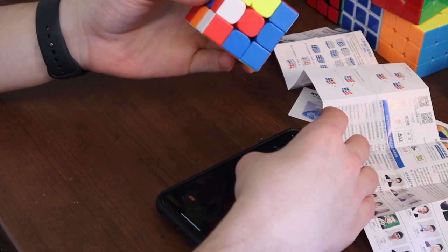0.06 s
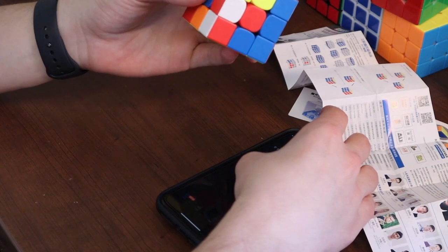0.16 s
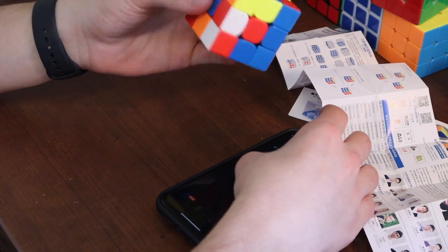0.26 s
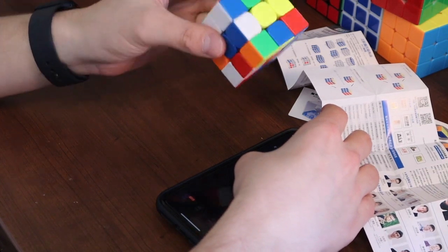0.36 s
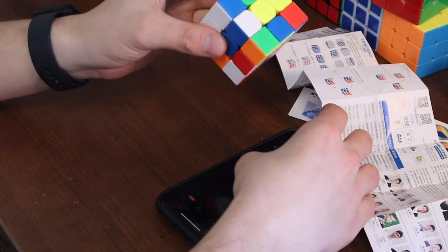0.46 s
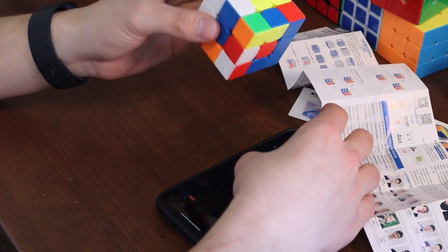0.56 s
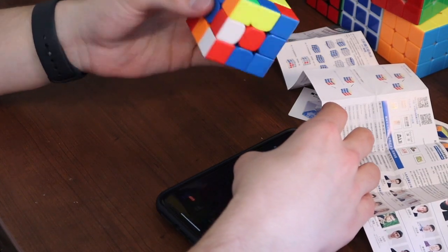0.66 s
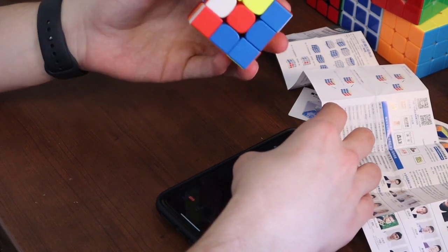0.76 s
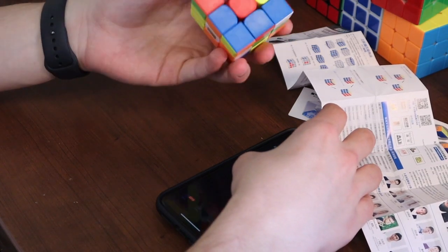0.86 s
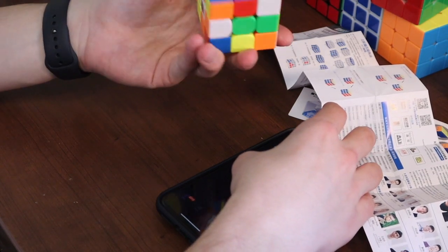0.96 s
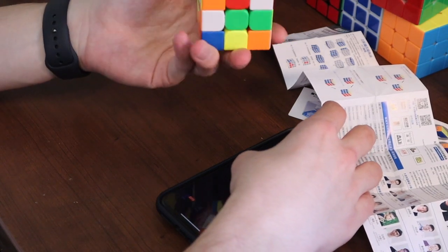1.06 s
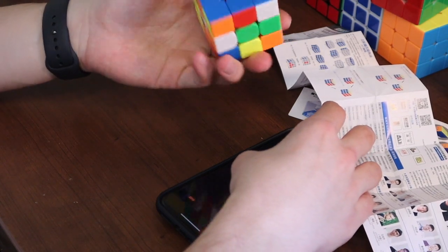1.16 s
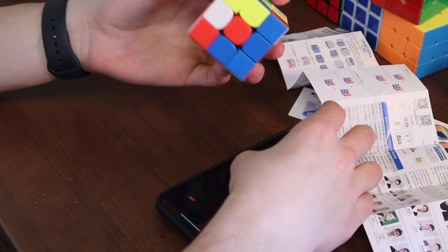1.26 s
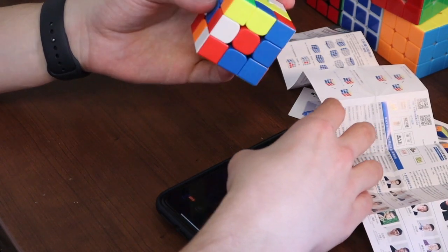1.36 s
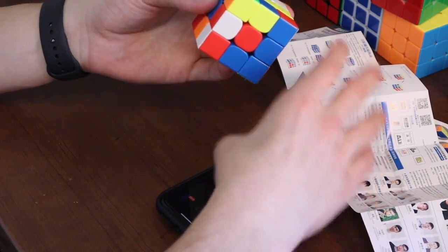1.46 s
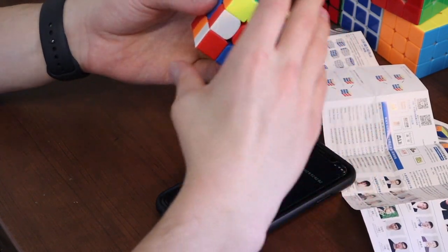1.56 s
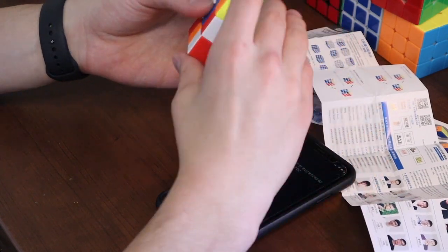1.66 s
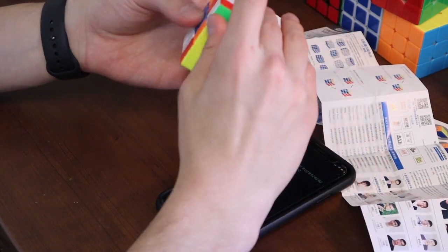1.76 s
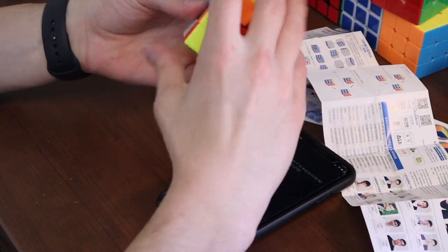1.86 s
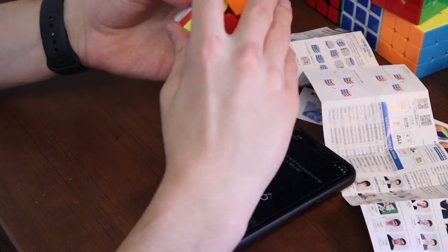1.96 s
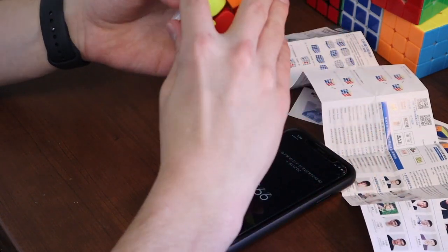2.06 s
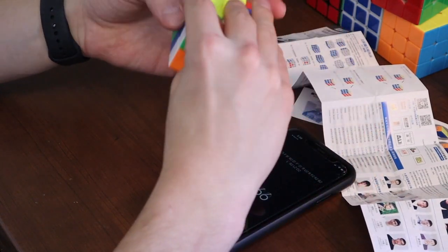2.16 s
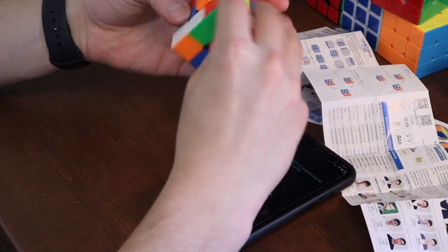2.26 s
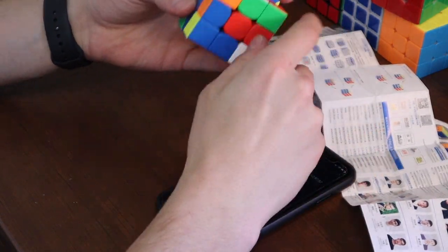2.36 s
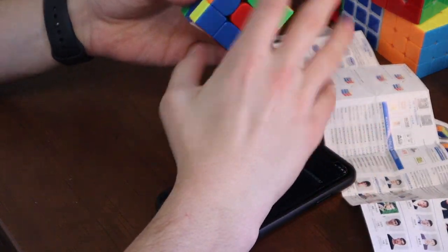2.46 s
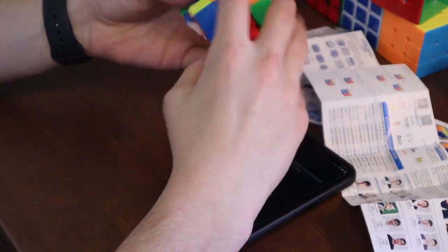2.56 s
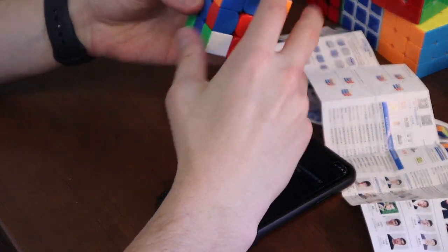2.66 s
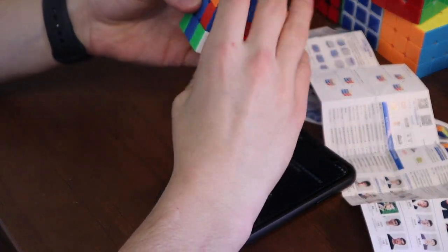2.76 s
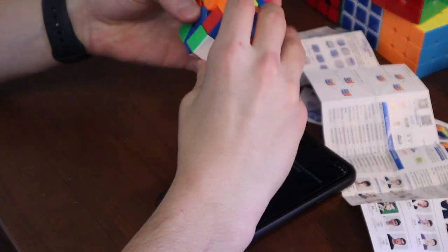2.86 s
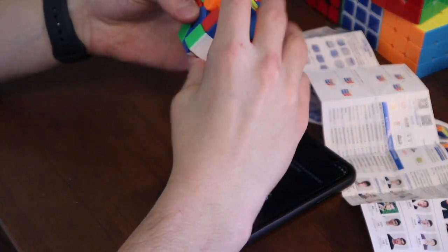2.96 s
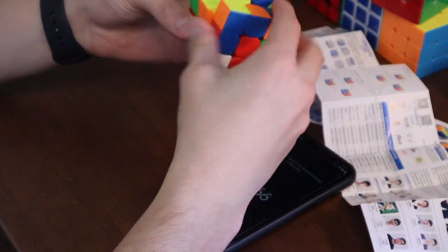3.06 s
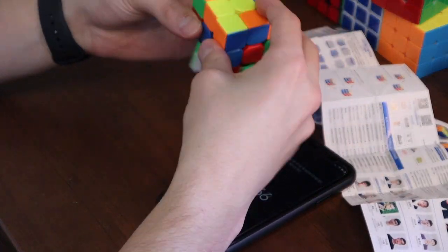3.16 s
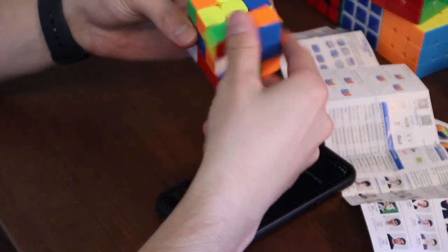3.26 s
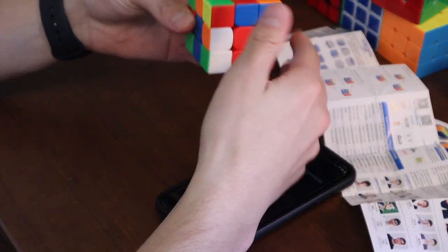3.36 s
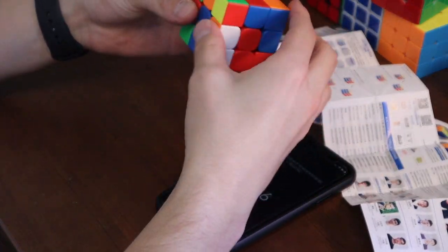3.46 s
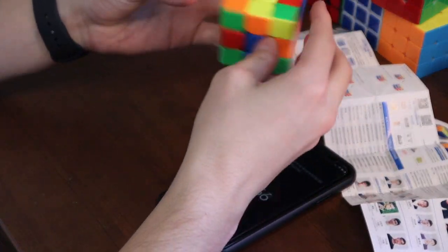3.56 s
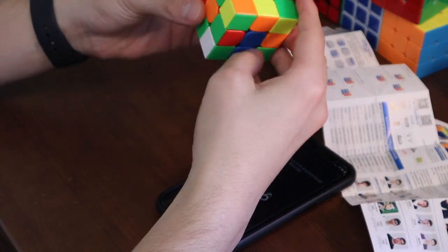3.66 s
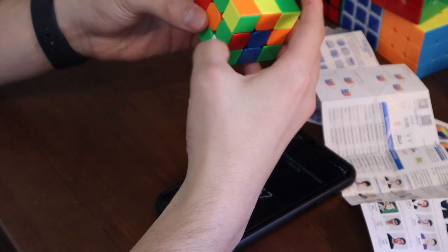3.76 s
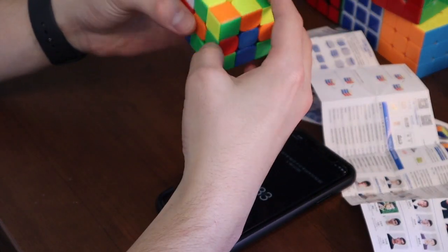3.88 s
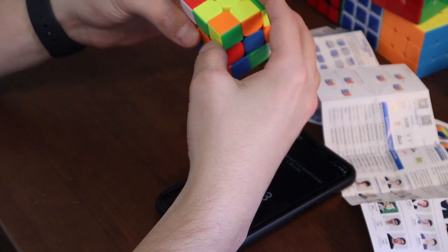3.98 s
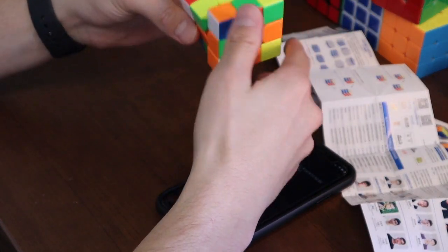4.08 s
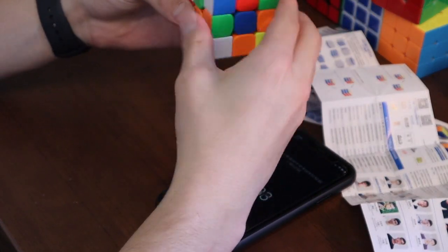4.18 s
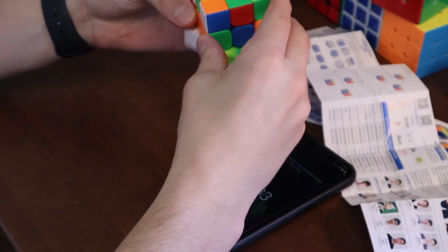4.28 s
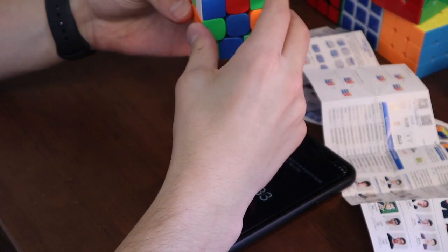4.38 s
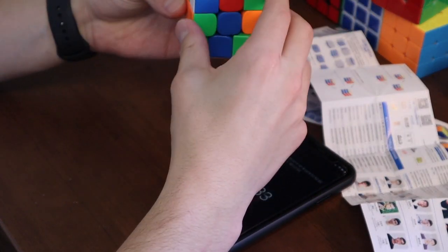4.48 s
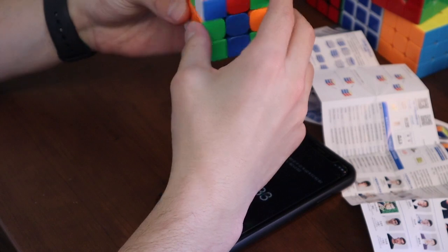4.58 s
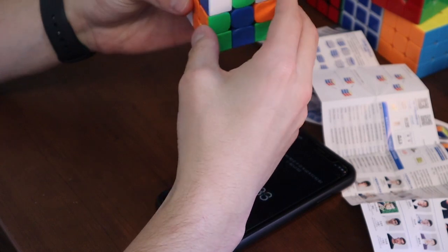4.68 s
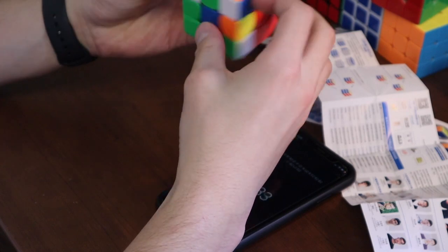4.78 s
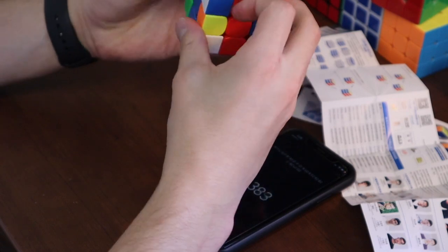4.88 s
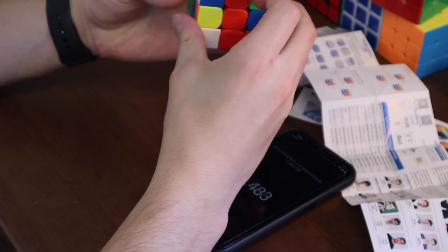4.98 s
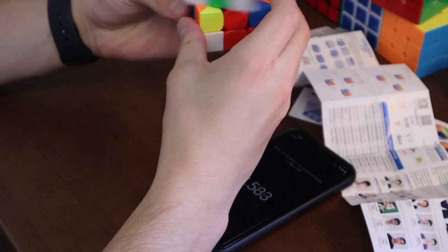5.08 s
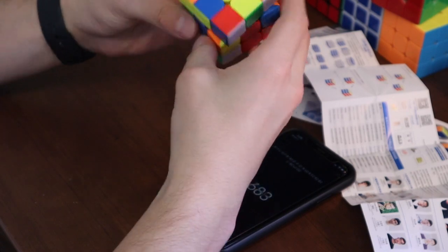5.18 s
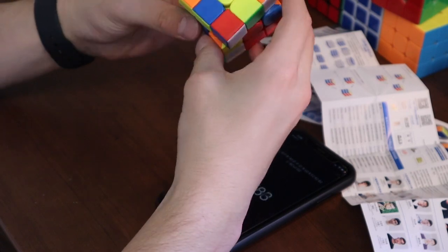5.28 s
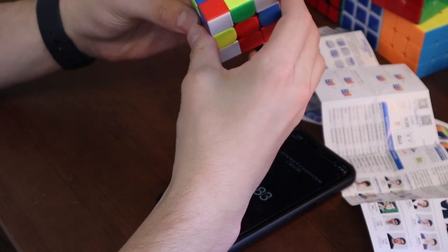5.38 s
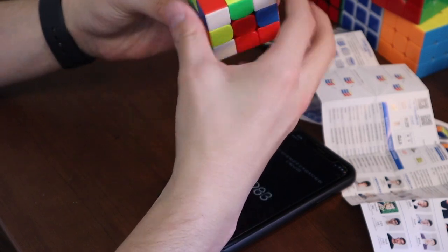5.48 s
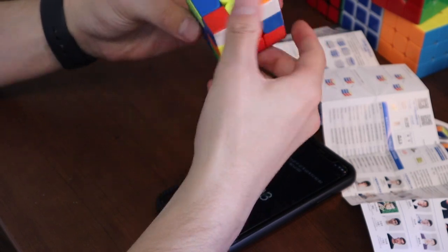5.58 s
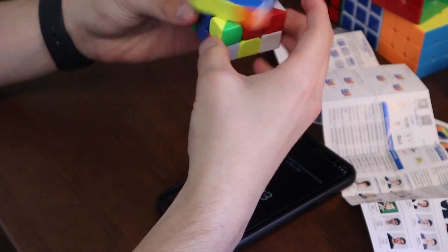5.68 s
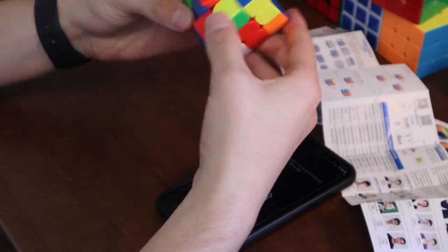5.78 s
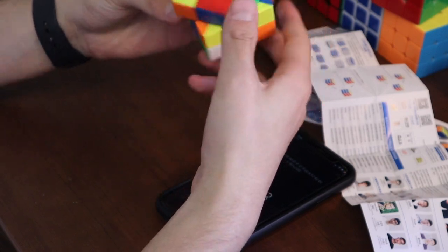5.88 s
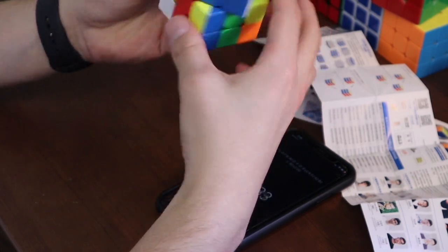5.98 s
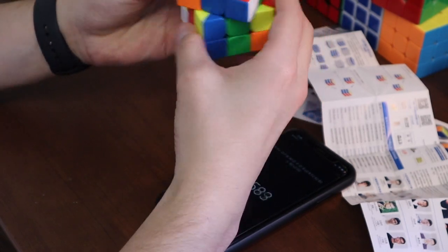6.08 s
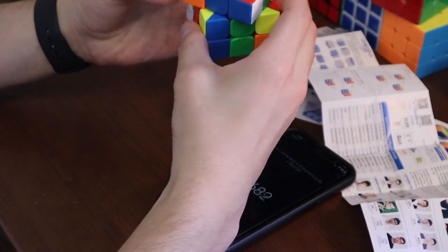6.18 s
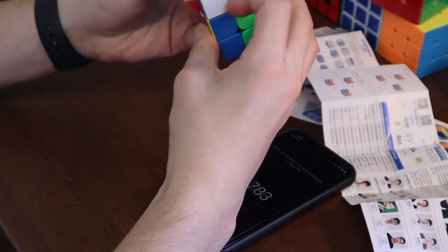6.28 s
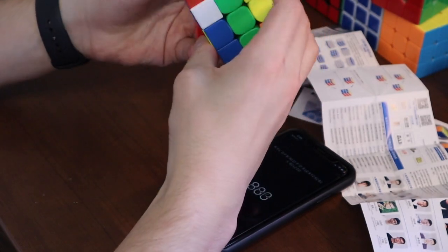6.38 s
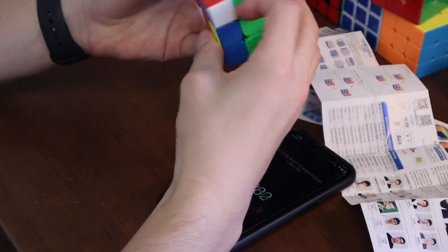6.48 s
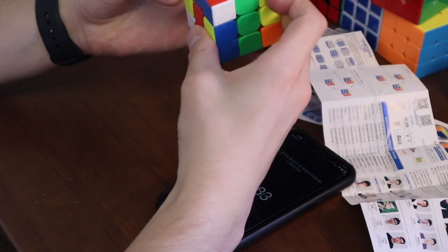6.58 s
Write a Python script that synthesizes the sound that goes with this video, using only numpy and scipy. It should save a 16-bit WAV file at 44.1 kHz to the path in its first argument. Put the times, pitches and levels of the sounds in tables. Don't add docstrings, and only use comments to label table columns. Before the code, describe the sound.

A close microphone in a small room picks up soft ventilation rumble, faint hum and hiss. Until about 1.5 s almost nothing happens but very faint fingertip touches. At 1.5 s a hand lifts with a dull, low desk tap. From 1.7 to 1.9 s a plastic puzzle cube starts turning with quick scrapes and hollow clacks; sharp snaps follow at 2.15 and 2.35 s, a smaller one at 2.6 s and a bright ping near 3.0 s. A dense, loud crackling burst fills 3.2 to 3.4 s. Light ticks lead to another hard clack cluster at 4.0 to 4.1 s, then single snaps near 4.3, 4.65 and 5.1 s. Loud rattling bursts return at 5.65 to 5.8 and 5.95 s, and again at 6.3 and 6.5 s, ending abruptly. The peaks are dry, bright and slightly distorted, with short room echoes.

```python
import sys
import numpy as np
from scipy import signal
from scipy.fft import rfft, irfft
from scipy.io import wavfile
from scipy.ndimage import uniform_filter1d

SR = 44100
rng = np.random.default_rng(int(sys.argv[2]) if len(sys.argv) > 2 else 0)


def dump(signal):
    limited = np.clip(np.atleast_2d(signal).T, -1, 1)
    pcm = np.round(limited * 32767).astype(np.int16)
    wavfile.write(sys.argv[1], SR, pcm)


def amplitude_ratio(level_db):
    exponent = np.asarray(level_db, float) / 20
    return 10 ** exponent


N = 292383

# [f/Hz, level/dB per Hz]
AIR_SPECTRUM = [(15, -39), (25, 4.5), (53, -3), (70, -1), (114, -1.5), (149, -2.5), (170, -9.5),
                (256, -2.5), (463, -11), (624, -15.5), (1440, -20.5), (1560, -20.5), (1740, -15.5),
                (1940, -24), (16000, -30.5)]
# [f/Hz, width/Hz, rms level/dB]
MACHINE_HUMS = [(183.2, 6, -62.5), (256.4, 9.1, -66), (360, 3.55, -61.5), (1460, 30, -71)]
# [t/s, level/dB]
WHINE_LEVEL = [(.3, -72), (.45, -76), (.5, -80), (.515, -63), (.55, -80), (.585, -78), (.6, -59),
               (.68, -59), (.74, -66), (.76, -76), (.78, -62), (.87, -66), (.93, -72), (.96, -64),
               (.99, -74), (1.025, -62), (1.05, -80), (1.09, -63), (1.14, -70), (1.21, -78), (1.24, -65),
               (1.27, -76), (1.4, -78)]
# [t/s, level/dB]
DRONE_LEVEL = [
    (2.8, -68),
    (3.05, -55),
    (3.3, -65),
    (3.68, -66),
    (3.78, -53.5),
    (4.3, -57),
    (4.55, -63.5),
]
# [t/s, level/dB]
RUMBLE_LEVEL = [
    (0, -62),
    (1.2, -55.5),
    (2.4, -62),
    (3.5, -55),
    (4.4, -62),
    (5.3, -53),
    (5.8, -62.5),
    (6.63, -71),
]
# [f/Hz, t60/s]
ROOM_DECAY = [(400, 0.3), (1300, 0.4), (3200, 0.11), (5500, 0.33), (7500, 0.11), (9500, 0.093),
              (12000, 0.043), (15000, 0.12)]
# [t/s, peak level/dB, f/Hz, t60/s]
DESK_TAPS = [(1.4903, -36, 2120, 0.041), (1.4905, -43, 3100, 0.026), (1.4905, -44, 3650, .015),
             (1.492, -40, 1430, .04), (1.4955, -23, 109, 0.066), (1.4945, -34.5, 199, 0.18),
             (1.4915, -26.5, 433, 0.029), (1.492, -34, 580, 0.064), (1.492, -43, 1070, 0.071),
             (2.841, -35, 67, 0.17), (3.64, -40.5, 360, 0.23), (3.678, -30.5, 83.7, 0.17),
             (5.141, -39, 90, 0.19)]
# [t/s, peak level/dB, f/Hz, t60/s]
PIECE_PINGS = [(1.866, -11.5, 4720, 0.015), (1.889, -19, 4730, 0.044), (3.2525, -8.5, 4230, .012),
               (5.7076, -19, 8500, .008), (2.1529, -0.5, 8170, 0.013), (2.909, -23.5, 2470, 0.015),
               (2.9822, -13, 6590, 0.015), (2.9825, -18.5, 7200, 0.011), (5.8, -33.5, 1112, 0.31),
               (6.5615, -10, 1670, 0.017), (6.2645, -27, 1750, 0.016), (6.314, -8, 1667, 0.026)]
# [start t/s, level/dB, length/s]
LAYER_TURNS = [(1.73, -31.5, 0.065), (1.85, -23.5, 0.055), (2.136, -28, 0.087), (2.3, -41, 0.16),
               (2.6, -28, 0.037), (2.86, -53.5, 0.061), (3.155, -42, 0.11), (3.55, -54, 0.03),
               (3.665, -34, 0.018), (3.968, -33, 0.097), (4.308, -54, .07), (4.633, -32.5, 0.065),
               (4.866, -55.5, 0.11), (5.087, -32.5, 0.067), (5.646, -32.5, 0.08), (5.796, -56, 0.079),
               (5.899, -35, 0.045), (5.947, -30.5, 0.048), (6.251, -43, 0.027), (6.33, -36, 0.054),
               (6.43, -47, 0.044), (6.51, -33, 0.12)]
# [f/Hz, width/Hz, level/dB]
BODY_MODES = [(463, 300, -19.5), (949, 203, 8), (1154, 1060, 1.5)]
# [f/Hz, width/Hz, level/dB]
HOLLOW_MODES = [(1540, 720, -4), (1794, 360, 9), (2625, 1500, -10.5)]
# [f/Hz, width/Hz, level/dB]
SHELL_MODES = [(3020, 590, -6.5), (3680, 420, -1), (4620, 620, 0), (5300, 900, 0)]
# [f/Hz, width/Hz, level/dB]
EDGE_MODES = [(6770, 1490, 0), (7456, 1230, 3), (8500, 1420, -1.5), (10600, 2000, -5.5),
              (11890, 3600, -10.5)]
# [t/s, level/dB]
GRIP_BOOM = [(1.75, 13), (1.87, 6.5), (2.15, 0.5), (2.34, 4), (2.6, 10), (2.95, 8.5), (3.25, 1.5),
             (3.36, 5), (3.6, 8.5), (4.02, 1), (4.08, -1), (4.32, 1.5), (4.67, 5.5), (5.1, 7), (5.72, 1.5),
             (5.8, 1.5), (5.95, 2), (6.3, 0.5), (6.5, 1)]
# [t/s, peak level/dB, hollow level/dB]
FINGER_BRUSHES = [(.355, -47, -2), (.954, -49.5, -7), (1.026, -49, 8), (1.293, -46.5, -2), (1.4928, -43, 3),
                  (1.717, -40, -4), (2.0882, -45, 12), (2.1116, -34, 7), (2.2945, -39, 4), (2.521, -42, -2),
                  (2.8245, -39, 1), (4.567, -50, 9), (2.8483, -39, 2), (2.8951, -42, 3), (3.148, -42, -12),
                  (5.0634, -44, 2), (3.6536, -40, 7), (3.7493, -39.5, 7), (3.8695, -44, 3), (3.95, -41, 5),
                  (4.2382, -44, 4), (4.4232, -40, 12), (4.7863, -40.5, 6), (4.8085, -41, 2),
                  (5.0813, -45, 9), (5.3656, -42.5, -1), (6.148, -42.5, 13), (6.1992, -37.5, -2),
                  (6.467, -35.5, 16), (6.4955, -30.5, 19)]
# [t/s, peak level/dB, hollow level/dB]
LOOSE_TICKS = [(1.926, -29.5, -14), (1.9483, -33, 3), (1.9604, -32.5, 3), (2.305, -27, 1), (2.3725, -31, 4),
               (2.3983, -33.5, -7), (2.6608, -27, -1), (2.91, -29.5, 0), (3.0125, -33.5, -3),
               (3.1165, -33, -3), (3.129, -30, 0), (3.1883, -33, -2), (3.2, -28.5, -1), (3.559, -33.5, 1.5),
               (3.6229, -36.5, -3), (3.6742, -28, 12), (3.9644, -36.5, -9), (4.133, -27.5, 3.5),
               (4.2474, -34, 10), (4.287, -37.5, -1), (4.7074, -30.5, -1), (4.7217, -32, -3),
               (4.842, -36, 1), (5.0978, -33, 9), (5.1493, -25.5, 0.5), (5.7768, -35, -16),
               (5.8883, -34, -6), (6.2333, -33, -11), (6.2774, -25, -18), (6.3676, -26, -15)]
# [t/s, peak level/dB, hollow level/dB, edge level/dB]
PIECE_CLICKS = [(1.8426, -29, -1, 0), (2.1232, -30, -3, 5), (2.8394, -43, 3, -3), (3.0074, -38, -7, 5),
                (3.0218, -39, 2, 9), (3.11, -47, 3, -6), (3.1683, -38, -9, -5), (3.5653, -51, -4, 4),
                (3.5818, -45, -3, 7), (3.6387, -43, -3, -8), (3.6816, -34, -5, -4), (3.696, -38, -4, 8),
                (3.958, -39.5, 7, -6), (4.8482, -42, 5, -5), (5.172, -38, -2, 0), (5.6535, -33, -7, 0),
                (5.8398, -32, -8, -1), (5.855, -40, 0, 1), (5.866, -37, -1, -2), (5.9075, -32, 2, 2),
                (5.925, -29, 1, 5), (6.055, -39, 0, 0), (6.2935, -22.5, -3, -4), (6.408, -36, -3, -2),
                (6.4323, -36, -2, -6), (6.4784, -40, 3, 3), (6.4866, -45, 1, 5)]
# [t/s, peak level/dB, hollow level/dB, contact/ms]
NEIGHBOUR_RATTLES = [(1.7373, -25.5, -3, 1.2), (1.7468, -21.5, -1, 1.7), (1.8924, -19, -0.5, 1.3),
                     (2.1638, -22, -1, 3.8), (2.1694, -16, -7, 1.5), (2.1938, -22, -8, 1.6),
                     (2.605, -24.5, -11.5, 2.2), (2.632, -21, -3, 0.4), (2.644, -26.5, -8, 2.9),
                     (3.2073, -17, 1, 0.33), (3.3125, -21.5, -10, 2), (3.3932, -23, -2, .8),
                     (3.9869, -24.5, 1.5, 1.9), (4.0687, -17, -14, 0.55), (4.088, -26.5, 6, 0.65),
                     (5.108, -23, 3, 1.5), (5.698, -21.5, -4, 0.73), (5.9115, -22, 2, 1.2),
                     (5.948, -24, 8, 2.5), (5.9542, -24, -25, .8), (5.9651, -18.5, 8, 1.8),
                     (6.0379, -26, 1, 2), (6.2654, -28.5, 13, .9), (6.3302, -24.5, 4, 1.5),
                     (6.3486, -37.5, -10, 1.7), (6.395, -28.5, 2, 2), (6.592, -27.5, -12, .8)]
# [t/s, peak level/dB, hollow level/dB, edge level/dB, contact/ms]
LAYER_GRINDS = [(1.7777, -29, 0, 3.0, 0.4), (1.8686, -13.5, -0.5, 1, 2.4), (3.2542, -5, -6, 3, 0.63),
                (3.3568, -5.0, -3.0, 9, 2.9), (4.0747, -5.5, 1, 6, 0.7), (4.0817, -18.5, -5.0, 3, 0.7),
                (5.7292, -3, -15, 4.5, 2.6), (5.8023, -14.0, -5, -4, 1.1), (5.9604, -9, -6, 3, 0.8),
                (6.3183, -4.5, -6, 8, 0.35), (6.5196, -13.0, -26, -13, 0.67), (6.5626, -14, -9, -1.5, 0.48)]
# [t/s, peak level/dB, hollow level/dB, edge level/dB, contact/ms]
CORNER_JAMS = [(1.8861, -29, 8, -16, 2.8), (2.1842, -22, -1, -16, 4.2), (2.3193, -22, -5, -0.5, 2.5),
               (2.3534, -25, -1.5, 6, 2.4), (2.3591, -28.5, -3, 5.5, 1.8), (2.6141, -15, -7, 3.5, 1.4),
               (3.2285, -10, -10, -2.5, 2.8), (3.3364, -26, -3, -15, 1.3), (3.362, -12, -15.5, -3, 2.3),
               (4.0065, -21, -1, -9, 0.63), (4.0241, -18, -4, 16.5, 1.1), (4.0581, -14.5, 0.0, 3, 1.6),
               (4.106, -29, -2, -2, 1.7), (4.3064, -21.5, 0.0, 4, 3.1), (4.3351, -22, -5, -1, 2.3),
               (4.3504, -20.5, -2.0, 1.5, 2.7), (4.6541, -22, -1, 3, 2.7), (4.6734, -24.5, -3, 6.5, 2.2),
               (5.1335, -21, -5, -6, 2.4), (5.6766, -21, 5, -1.0, 2.3), (5.7329, -16, -2, -15, 1.8),
               (5.75, -23, -10, -9, 1.9), (5.7828, -16.5, -10, -1.0, 1.6), (5.8185, -21.5, -7, 11, 1.3),
               (5.9714, -19.0, -17, -1, 2.1), (6.3065, -12, -1, 6, 2.3), (6.3873, -28, -6, -10, 2.3),
               (6.5124, -4, -7.0, 7, 1.5), (6.5778, -38, -9, 15, 1.6)]
# [t/s, peak level/dB, hollow level/dB, edge level/dB, contact/ms]
LAYER_SNAPS = [(1.7614, -14.0, -6.5, 0.5, 0.87), (1.786, -27, -7, -1.5, 1.1), (1.8492, -20, -3.5, 2, 4.1),
               (2.1303, -20.5, 1, 2.5, 3), (2.1487, -18.5, -3, -13, 2.4), (2.1529, -8, 0, 13, 0.47),
               (2.1776, -17.5, -6, -5, 1.5), (2.3351, -14.5, 2, 9, 1.9), (2.592, -25.5, -5, 2, 1.5),
               (2.9822, -22.5, -12, 0.5, 1.3), (3.2222, -7, 1, 1.5, 0.65), (3.2423, -7, -7.0, 8, 3.7),
               (3.264, -11, -3, 3, 2.5), (3.27, -7.5, -16, 4, 1.6), (3.2845, -10, -5, 4.5, 0.66),
               (3.3203, -18.0, -3, 4.5, 0.79), (3.3796, -16.5, -6, 9.5, 1.3), (3.9974, -26, 1.0, 8, 1.3),
               (4.0021, -13, 2.0, 6, 2.8), (4.0193, -4.5, -5, -1, 1.06), (4.3211, -11.0, -3, -2.0, 0.46),
               (5.1217, -11.5, -11.5, 1.5, 2), (5.6585, -21.5, -12.0, -0.5, 0.9),
               (5.6665, -20.5, 6.0, 6.5, 1.5), (5.6934, -13.5, -6.5, 1.5, 1.4),
               (5.7076, -13.5, -6, 12, 0.7), (5.7127, -12.0, -1.5, 4, 3.4), (5.7233, -7.5, 8, 16, 0.77),
               (5.7964, -12.5, 2, 7.5, 1.8), (5.9308, -13, -3.5, -2, 2), (6.3002, -13.5, -7, 4.5, 2.5),
               (6.3138, -4, -10.5, 1, 0.82), (6.5058, -12, -5.5, 1.5, 3.1)]

AIR_DB = -50
WHINE_HZ, DRONE_HZ, RUMBLE_HZ = 1701, 150, 45
ROOM_DB, ROOM_GAP_S = -12.5, 0.0072
POSES_PER_S = 70
SIZE, LEAD_S = 2048, 0.012
DULL_HZ = 15300
TICK_MS, BRUSH_MS, CONTACT_SCATTER_DB = 0.38, 1, 0.8
RATTLE_EDGE_DB, TICK_EDGE_DB, BRUSH_EDGE_DB = 3, 4.5, 3.5
SNAP_RISE_MS, JAM_RISE_MS, GRIND_RISE_MS, LIGHT_RISE_MS = 0.15, 2.6, 1.3, 0.25
LOW_HZ, TOP_HZ = 38, 15800


def level(x, db):
    return x * amplitude_ratio(db) / np.sqrt(np.mean(x ** 2))


def curve(table):
    s, db = np.transpose(table)
    return amplitude_ratio(np.interp(np.arange(N) / SR, s, db, left=-120, right=-120))


def frequencies(size):
    return np.arange(1, size // 2 + 2) * SR / size


def rings(modes, hz, detune=0.0, scatter_db=0.0, count=1):
    f, width, db = np.transpose(modes)
    chance = rng.standard_normal((count, 2, len(f)))
    f = f * (1 + detune * chance[:, 0])
    gain = amplitude_ratio(db + scatter_db * chance[:, 1])
    response = 0
    for k in range(len(width)):
        centre = f[:, k, None]
        off_tune = (hz / centre - centre / hz) * centre / width[k]
        response = response + (-1) ** k * gain[:, k, None] / (1 + 1j * off_tune)
    return response


def through(x, response):
    return irfft(rfft(x) * response, x.shape[-1])


def walk(rate):
    k = int(SR / rate)
    held = np.repeat(rng.standard_normal(N // k + 1), k)
    return 0.21 * uniform_filter1d(uniform_filter1d(held, k), k)[:N]


def add(out, s, rows):
    for start, row in zip((s * SR).astype(int), rows):
        out[start:start + len(row)] += row[:N - start]
    return out


def air():
    f, db = np.transpose(AIR_SPECTRUM)
    shape = amplitude_ratio(np.interp(np.log(frequencies(N)), np.log(f), db))
    return level(through(rng.standard_normal(N), shape), AIR_DB) * amplitude_ratio(0.18 * walk(0.69))


def machine_tone(f, flicker_db=2.8, rate=7):
    phase = 2 * np.pi * np.cumsum(f * (1 + 0.002 * walk(7.7))) / SR
    return np.sqrt(2) * amplitude_ratio(flicker_db * walk(rate)) * np.sin(phase)


def machines():
    out = np.zeros(N)
    for f, width, db in MACHINE_HUMS:
        narrow = rings([(f, width, 0)], frequencies(N))[0] ** 2
        out += level(through(rng.standard_normal(N), narrow), db)
    out += curve(WHINE_LEVEL) * machine_tone(WHINE_HZ, flicker_db=-3, rate=12)
    out += curve(DRONE_LEVEL) * machine_tone(DRONE_HZ)
    return out + curve(RUMBLE_LEVEL) * machine_tone(RUMBLE_HZ)


def room(x, count=4):
    t, hz = np.arange(8 * SIZE) / SR, frequencies(8 * SIZE)
    out = 0
    for k in range(count):
        echoes = np.zeros(len(t))
        for f, t60 in ROOM_DECAY:
            band = rings([(f, 0.98 * f, 0)], hz)[0]
            echoes += through(rng.standard_normal(len(t)), band) * amplitude_ratio(-60 * t / t60)
        echoes *= 1 - np.exp(-(t / ROOM_GAP_S) ** 2)
        echoes *= amplitude_ratio(ROOM_DB) / np.sqrt((echoes ** 2).sum())
        away = (np.arange(N) * POSES_PER_S / SR - k) % count - 1
        pose = np.cos(np.pi / 2 * np.clip(away, -1, 1))
        out = out + signal.fftconvolve(x * pose, echoes)[:N]
    return out


def strikes(table):
    s, db, hz, t60 = (c[:, None] for c in np.transpose(table))
    t = np.arange(4 * SIZE) / SR
    waver = np.cumsum(rng.standard_normal((len(s), len(t))), axis=1) * 3.6e-5 * hz
    onset = 1 - np.exp(-t * hz * 2)
    blows = amplitude_ratio(db - 60 * t / t60) * onset * np.sin(2 * np.pi * hz * t + waver)
    return add(np.zeros(N), s[:, 0], blows)


def slide():
    t, hz = np.arange(N) / SR, frequencies(N)
    strength = amplitude_ratio(1.6 * rng.exponential(size=N) + 4.5 * walk(150))
    ticks = rng.standard_normal(N) * (rng.random(N) < 0.1) * strength
    pieces = amplitude_ratio(-6.5) * rings(HOLLOW_MODES, hz) + rings(SHELL_MODES, hz) + amplitude_ratio(-0.5) * rings(EDGE_MODES, hz)
    moving = np.zeros(N)
    for s, db, length in LAYER_TURNS:
        moving += amplitude_ratio(db) * np.clip((t - s) * (s + length - t), 0, 1) * 4 / length ** 2
    return level(through(ticks, pieces[0]), 0) * moving


def contacts():
    rows = [(*row, SNAP_RISE_MS) for row in LAYER_SNAPS]
    rows += [(*row, JAM_RISE_MS) for row in CORNER_JAMS]
    rows += [(*row, GRIND_RISE_MS) for row in LAYER_GRINDS]
    light = [(s, db, hollow_db, RATTLE_EDGE_DB, ms) for s, db, hollow_db, ms in NEIGHBOUR_RATTLES]
    light += [(*row, TICK_MS) for row in PIECE_CLICKS]
    light += [(*row, TICK_EDGE_DB, TICK_MS) for row in LOOSE_TICKS]
    light += [(*row, BRUSH_EDGE_DB, BRUSH_MS) for row in FINGER_BRUSHES]
    return np.transpose(rows + [(*row, LIGHT_RISE_MS) for row in light])


def ring_pieces(push, weights, detune, scatter_db, size):
    count, hz = len(push), frequencies(SIZE)
    colour = 0
    for weight, modes in zip(weights, (BODY_MODES, HOLLOW_MODES, SHELL_MODES, EDGE_MODES)):
        part = rings(modes, hz, detune, scatter_db, count)
        colour = colour + weight * part / np.sqrt((np.abs(part) ** 2).sum(axis=1, keepdims=True))
    colour = colour / (1 + 1j * hz / DULL_HZ) ** 2
    if size > 1:
        colour = np.sqrt(uniform_filter1d(np.abs(colour) ** 2, size, axis=1))
    push = push * rng.standard_normal((count, SIZE))
    even = np.sqrt(uniform_filter1d(np.abs(rfft(push)) ** 2, size=90, axis=1))
    return through(push, colour / even)


def knocks():
    s, peak_db, hollow_db, edge_db, ms, rise_ms = (c[:, None] for c in contacts())
    ms = ms * amplitude_ratio(CONTACT_SCATTER_DB * rng.standard_normal(ms.shape))
    width = np.clip(ms, 0.25, 5) / 1000
    t = np.arange(SIZE) / SR - LEAD_S
    before, after = np.minimum(t, 0), np.maximum(t, 0)
    contact = np.exp(-(before * 1000 / np.maximum(rise_ms, 0.05)) ** 2 - after / (1.7 * width))
    approach = (1 + before / LEAD_S) * np.exp(before * 1000 / (3 * rise_ms + 0.5))
    scrape = amplitude_ratio(-9.5) * approach * np.exp(-after / 0.0075)
    boom_db = hollow_db - 10.0 + np.interp(s, *np.transpose(GRIP_BOOM))
    weights = amplitude_ratio(boom_db), amplitude_ratio(hollow_db), 1, amplitude_ratio(edge_db)

    knock = ring_pieces(contact + scrape, weights, detune=0.034, scatter_db=1.5, size=1)
    loudest = uniform_filter1d(knock ** 2, size=60, axis=1).max(axis=1, keepdims=True)
    knock *= amplitude_ratio(peak_db) / np.sqrt(loudest)
    tail = np.broadcast_to((t > 0) * np.exp(-after / 0.012), knock.shape)
    blur = ring_pieces(tail, weights, detune=0.027, scatter_db=-1.5, size=130)
    blur *= np.sqrt((knock ** 2).sum(axis=1, keepdims=True) / (blur ** 2).sum(axis=1, keepdims=True))
    start = s[:, 0] - LEAD_S - 0.0003
    return add(np.zeros(N), start, knock), add(np.zeros(N), start, blur)


def scene():
    background = air() + machines()
    direct, blurred = knocks()
    rest = strikes(DESK_TAPS) + strikes(PIECE_PINGS) + slide()
    return (direct + rest + room(blurred + rest) + background)[None]


def low_pass(x):
    return signal.sosfilt(signal.butter(12, 16620, fs=SR, output="sos"), x)


def record(dry):
    cut = signal.sosfilt(signal.butter(4, LOW_HZ, "high", fs=SR, output="sos"), dry)
    cut = signal.sosfilt(signal.ellip(8, 0.2, 40, TOP_HZ, fs=SR, output="sos"), cut)
    return low_pass(np.clip(cut, -1, 1))


dry = scene()
out = record(dry)
dump(out)
```